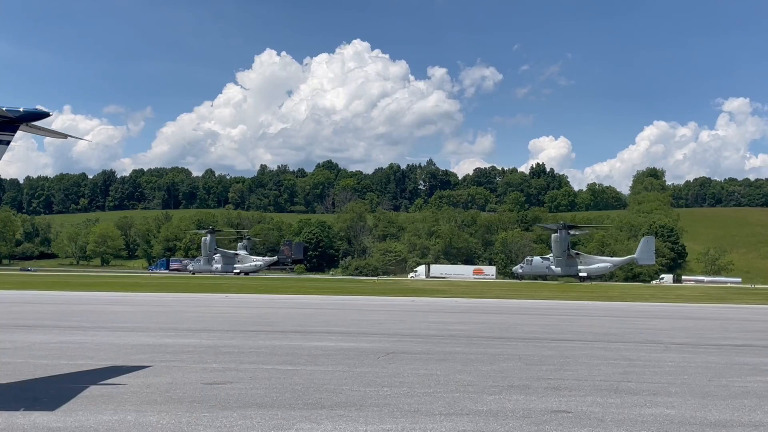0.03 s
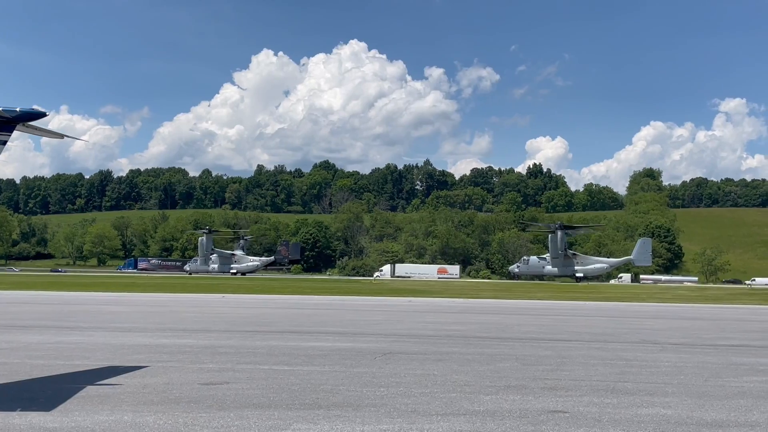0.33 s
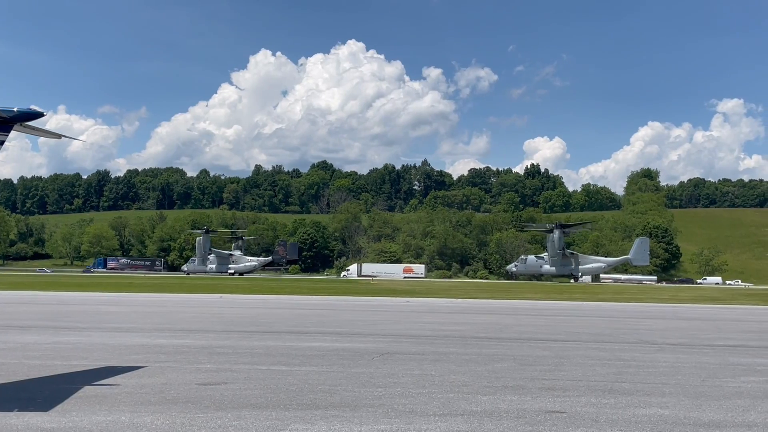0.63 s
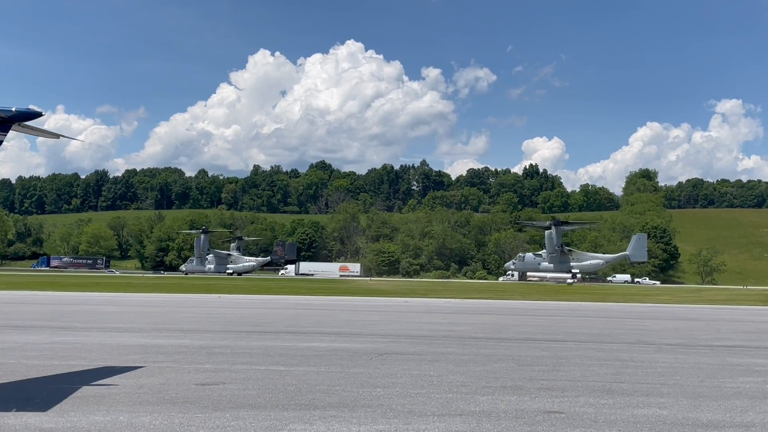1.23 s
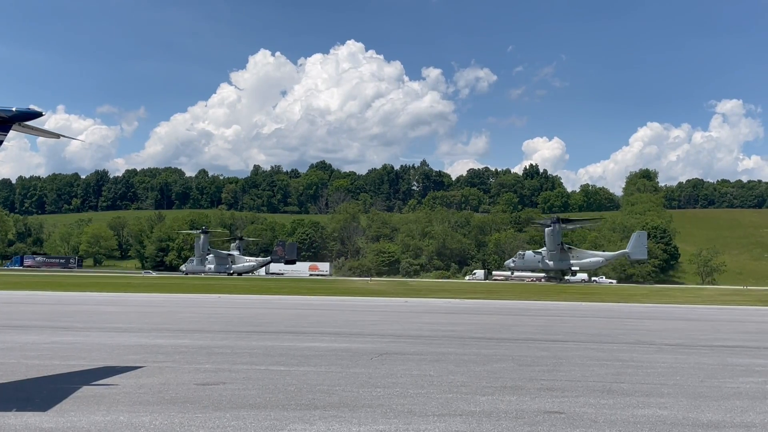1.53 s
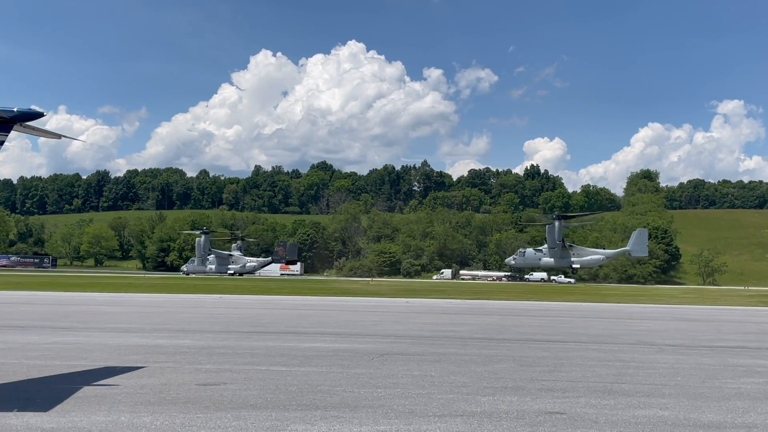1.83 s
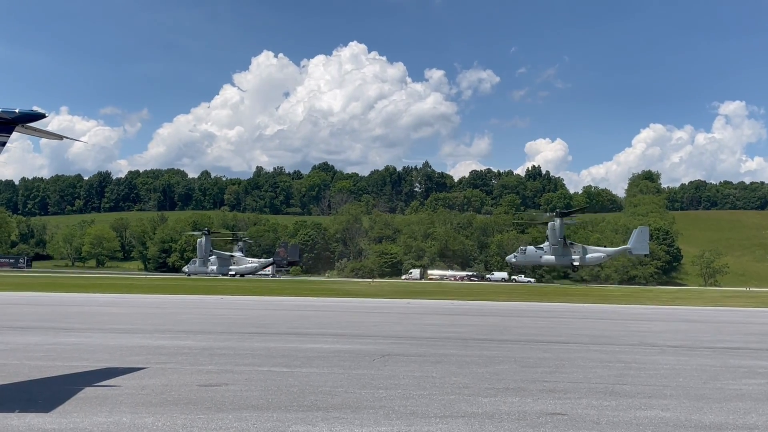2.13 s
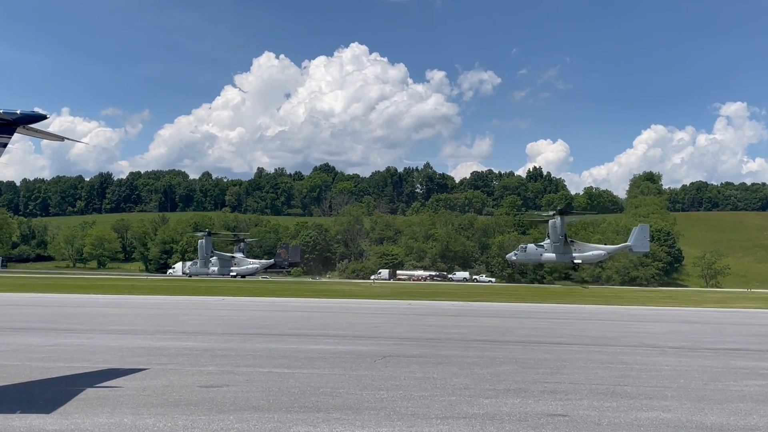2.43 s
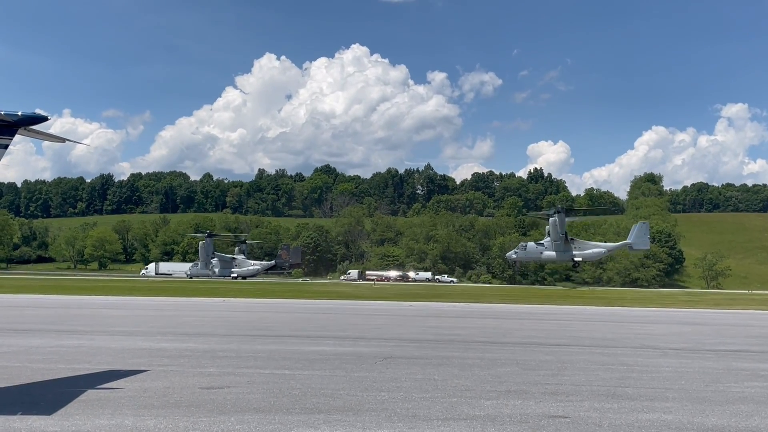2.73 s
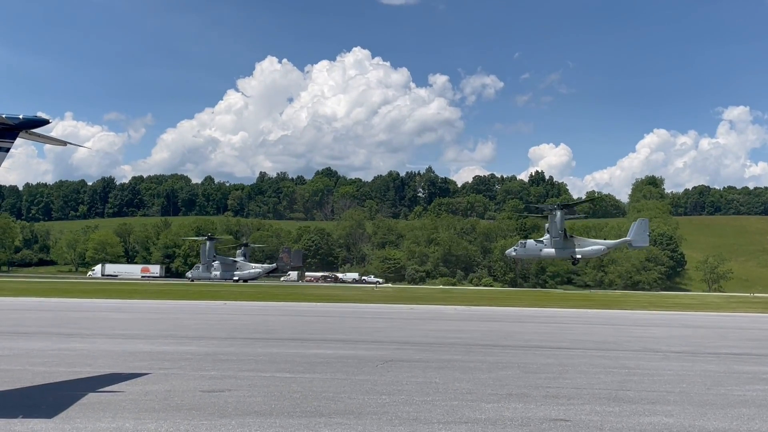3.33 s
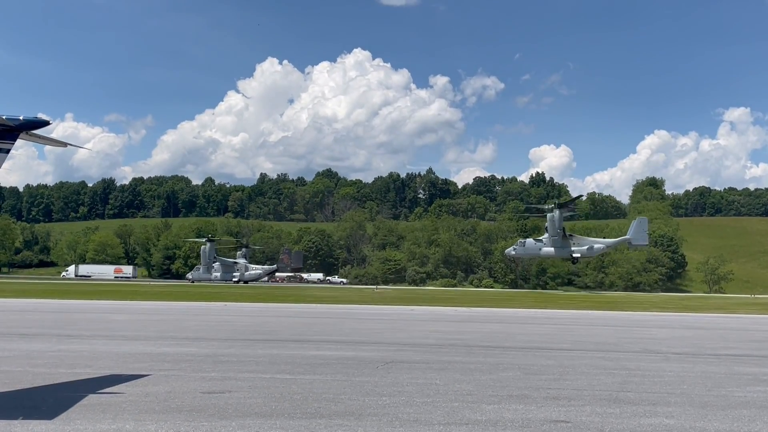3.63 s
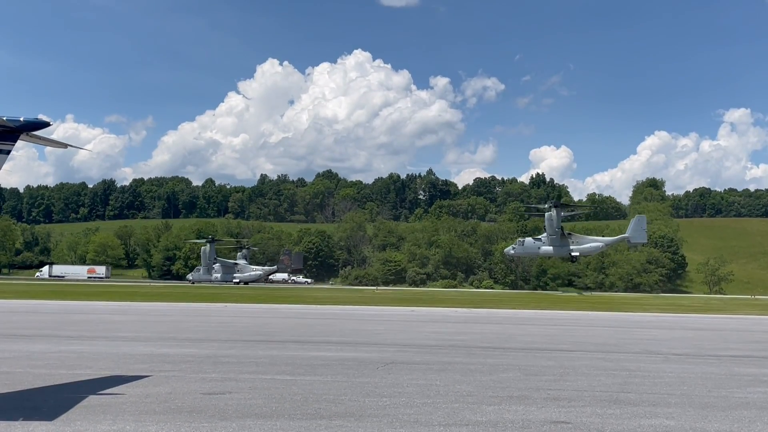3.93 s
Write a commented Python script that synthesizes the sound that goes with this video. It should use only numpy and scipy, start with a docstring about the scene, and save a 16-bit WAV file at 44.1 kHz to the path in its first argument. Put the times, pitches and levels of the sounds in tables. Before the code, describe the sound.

Tiltrotor aircraft rotors throb deeply from the start, with hard, rapid blade slaps over roaring downwash and turbine hiss. By about 0.5 seconds a second aircraft's blades join with a pulsing swish. After 1.6 seconds the slaps thin out as the first aircraft lifts. A brief growl swells near 2.3 seconds, and sharp cracks come around 2.6 and 3.6 seconds, while the throb and roar continue until 4 seconds.

```python
"""Two tiltrotor aircraft across an airfield: one lifts off, the other waits with rotors turning.
From the start, the lifting rotors throb in the bass over the roar of downwash and the hiss of turbines,
and their blades slap hard against tip vortices. Within half a second the waiting aircraft's blades join
in, swishing at a slightly slower rate. After 1.6 s, with the wheels clear, the slaps thin out. Near 2.3 s
a blade harmonic swells into a growl as the aircraft climbs; a few sharp cracks from either one follow."""
import sys
import numpy as np
from scipy import signal
from scipy.fft import rfft, irfft
from scipy.io import wavfile
from scipy.ndimage import uniform_filter1d, minimum_filter1d

SR = 44100
rng = np.random.default_rng(int(sys.argv[2]) if len(sys.argv) > 2 else 0)


def dump_mix(stems):
    """Bounce the given channels to the path in sys.argv[1] as a 16-bit WAV at rate SR."""
    frames = np.atleast_2d(stems).T  # one column per channel
    limited = np.clip(frames, -1, 1)  # hard clip at full scale
    pcm = np.round(limited * 32767).astype(np.int16)
    wavfile.write(sys.argv[1], SR, pcm)


N = 176400
T = np.arange(N) / SR
HZ = np.fft.rfftfreq(N, 1 / SR)
BLADE_HZ = 20.68  # blade-passage frequency of the lifting rotors


def amp(db):
    """Decibels to amplitude ratio."""
    return 10 ** (np.asarray(db) / 20)


def unit(x):
    """Normalisation to rms 1."""
    return x / np.sqrt(np.mean(x ** 2) + 1e-20)


def by_hz(points, hz=HZ):
    """Interpolation on a log-frequency axis."""
    f, value = np.transpose(points)
    return np.interp(np.log(hz + 1), np.log(f + 1), value)


def levels(table):
    """One amplitude envelope for each dB column of a time table."""
    s, *columns = np.transpose(table)
    return [amp(np.interp(T, s, db)) for db in columns]


def drift(rate_hz):
    """Random modulation: low-passed noise of rms 1."""
    spectrum = rfft(rng.standard_normal(N)) * (HZ > 0)
    return unit(irfft(spectrum / (1 + (HZ / rate_hz) ** 4), N))


def pair(a, b):
    """Partial coherence: two unrelated spectra mix as mid and side into left and right."""
    # Each row: frequency in Hz, coherence between the channels.
    coherence = [(100, .99), (330, .8), (600, .5), (950, .58), (1800, .97), (8000, .93)]
    same = np.clip(by_hz(coherence), 0, 1)
    mid, side = a * np.sqrt((1 + same) / 2), b * np.sqrt((1 - same) / 2)
    return irfft([mid + side, mid - side], N)


def noise(colour):
    """Spectral shaping of white noise, in stereo."""
    white = rfft(rng.standard_normal((2, N)))
    return unit(pair(*white * amp(by_hz(colour))))


def causal(colour):
    """Minimum-phase response: the phase follows from the log gain by Hilbert transform."""
    log_gain = np.log(amp(by_hz(colour, abs(np.fft.fftfreq(N, 1 / SR)))))
    return np.exp(np.conj(signal.hilbert(log_gain)))[:len(HZ)]


def scatter(t60):
    """Scattering from ground and trees: the spectrum of a sparse, decaying tail of echoes."""
    echoes = rng.standard_normal(N) * (rng.random(N) < .05)
    return rfft(unit(echoes * amp(-60 * T / t60))) / np.sqrt(N)


def multipath(drive, colour, echo_db=-16, echo_t60=.11, side_t60=.092):
    """Multipath propagation: coloured pulses arrive directly and as shifting echoes."""
    body = causal(colour)
    echoes = amp(echo_db) * rfft(drive * drift(1.8)) * scatter(echo_t60)
    side = rfft(drive * drift(16)) * scatter(side_t60)
    return unit(pair(body * (rfft(drive) + echoes), body * side))


def downwash_and_turbines(churn_hz=90, roar_churn_db=2, hiss_churn_db=1):
    """Turbulence noise: the downwash churns and roars under a steadier turbine hiss."""
    # Each row: time in seconds, roar level in dB, hiss level in dB.
    wash_levels = [(0, -16, -33), (.6, -20.5, -33.5), (.85, -19.5, -36), (1.3, -23.5, -39),
                   (1.7, -22.5, -36.5), (2.1, -23, -36.5), (4, -23, -35.5)]
    # Each row of both spectra: frequency in Hz, relative level in dB.
    roar_colour = [(20, -23), (50, -3), (130, 5), (400, 2), (800, -4.5), (1560, -14), (1820, -13),
                   (4000, -46.5)]
    hiss_colour = [(700, -18), (1800, 1.5), (2700, 4), (3800, -2), (5700, -4), (6900, -0.5), (9700, -21),
                   (11500, -27)]
    roar_gain, hiss_gain = levels(wash_levels)
    churn = drift(churn_hz)
    roar = roar_gain * unit(noise(roar_colour) * amp(roar_churn_db * churn))
    hiss = hiss_gain * noise(hiss_colour) * amp(hiss_churn_db * churn)
    return roar + hiss


def waiting_swish(blade_hz=20.49, first_s=.02, width_s=.0045, uneven_db=2.5):
    """Amplitude-modulated noise: each blade of the waiting aircraft passes with a crackly puff."""
    # Each row: time in seconds, level in dB.
    swish_levels = [(0, -66.5), (.5, -28), (2.2, -38), (2.6, -25.5), (2.9, -31.5), (3.25, -39.5),
                    (3.45, -28), (3.65, -29), (4, -27)]
    # Each row: frequency in Hz, relative level in dB.
    swish_colour = [(100, -30), (400, 9), (1200, 4.5), (1800, -5.5), (3000, -9), (4500, -14.5),
                    (7000, -23.5), (11000, -62)]
    from_blade_s = (((T - first_s) * blade_hz + .5) % 1 - .5) / blade_hz
    puffs = np.exp(-.5 * (from_blade_s / width_s) ** 2) * amp(uneven_db * drift(570))
    return levels(swish_levels)[0] * unit(puffs) * noise(swish_colour)


def throb(first_s=.024, trim_db=-2, waver_hz=.97, strong_rad=.34, weak_rad=.49, flutter_hz=2.56):
    """Rotational noise: the blades' suction pulses form a harmonic series that wavers in moving air."""
    # Each row: time in seconds, then levels of harmonics 3, 4 and 7 in dB before the trim.
    strong_harmonics = [(0.05, -10.5, -17.5, -57), (0.23, -14.5, -16, -23), (0.54, -28.5, -18.5, -18.5),
                        (1.33, -19.5, -21, -43), (1.63, -14, -28, -18), (1.71, -16.5, -18.5, -36),
                        (2.05, -22, -22, -25.5), (3.25, -15.5, -20.5, -26.5), (3.97, -29.5, -17.5, -28.5)]
    # Each row: harmonic number, mean level in dB.
    weak_harmonics = [(2, -41.5), (5, -42), (6, -35), (9, -33), (19, -36.5)]
    angle = 2 * np.pi * BLADE_HZ * (T - first_s)
    out = np.zeros(N)
    for k, gain in zip((3, 4, 7), levels(strong_harmonics)):
        out -= amp(trim_db) * gain * np.cos(k * angle + strong_rad * drift(waver_hz))
    for k, db in weak_harmonics:
        gain = amp(db + 3.5 * drift(flutter_hz))
        out -= gain * np.cos(k * angle + weak_rad * np.sqrt(k) * drift(waver_hz))
    return np.sqrt(2) * out


def growl(harmonic=17, peak_s=2.326, width_s=.1, peak_db=-24):
    """One high blade harmonic swells and fades under a Gaussian envelope as the aircraft climbs."""
    swell = np.exp(-.5 * ((T - peak_s) / width_s) ** 2)
    tone = np.cos(2 * np.pi * harmonic * BLADE_HZ * T + .5 * drift(10))
    return amp(peak_db) * swell * unit(tone)


def strikes(delay_s, jitter_s=.0003, uneven_db=1):
    """Quasi-periodic excitation: one impulse per blade passage, uneven in time and strength."""
    passes = np.arange(1, int(N / SR * BLADE_HZ) + 1) / BLADE_HZ
    jitter, size = rng.standard_normal((2, len(passes)))
    arrival_s = passes + np.interp(passes, T, delay_s + np.zeros(N)) + jitter_s * jitter
    out = np.zeros(N)
    out[np.clip((arrival_s * SR).astype(int), 0, N - 1)] = amp(uneven_db * size)
    return out


def hollow_ring(delay_s, bandwidth_hz=45):
    """Damped resonance: each thump dies away in a short ring of shifting pitch."""
    # Each row: time in seconds, level in dB, centre frequency in Hz.
    resonance = [(.15, -23, 227), (.47, -21, 149), (.58, -21.5, 387), (.72, -21.5, 310), (.82, -15, 178),
                 (.87, -18, 280), (1, -36, 304), (1.22, -16, 340), (1.65, -37.5, 338), (2.7, -36.5, 414)]
    s, db, centre_hz = np.transpose(resonance)
    carrier = np.exp(2j * np.pi * np.cumsum(np.interp(T, s, centre_hz)) / SR)
    pole = np.exp(-np.pi * bandwidth_hz / SR)
    ringing = carrier * signal.lfilter([1], [1, -pole], strikes(delay_s) / carrier)
    return amp(np.interp(T, s, db)) * unit(ringing.imag)


def slaps(delay_s, level_table, split_s=.001238, second_gain=.74, tear_db=-5, tear_s=.0024):
    """Blade-vortex interaction: a thump, and a double crack with a puff of torn air."""
    # Each row of both spectra: frequency in Hz, relative level in dB.
    thump_colour = [(60, -27.5), (130, -8.5), (230, -0.5), (360, -1.5), (750, -8.5), (6000, -88)]
    crack_colour = [(150, -53), (450, -1), (780, 9), (1350, 1.5), (1600, -8), (2600, -9), (4000, -26.5),
                    (11000, -67)]
    hits = strikes(delay_s)
    double = hits + second_gain * strikes(delay_s + split_s)  # two tip vortices struck in turn
    puff = signal.lfilter([1], [1, -np.exp(-1 / (tear_s * SR))], double) * rng.standard_normal(N)
    crack = unit(double) + amp(tear_db) * unit(puff)
    thump_gain, crack_gain = levels(level_table)
    return thump_gain * multipath(hits, thump_colour) + crack_gain * multipath(crack, crack_colour)


def twin_rotor(delay_s=.0128):
    """Blade-vortex interaction at the lifting aircraft's other rotor, later in each blade period."""
    # Each row: time in seconds, thump level in dB, crack level in dB.
    slap_levels = [(.6, -24, -44.5), (2.4, -31.5, -34), (2.55, -20.5, -28.5), (2.8, -36.5, -34)]
    return slaps(delay_s, slap_levels)


def near_rotor():
    """Varying travel time: the near rotor's slaps and ring come early or late as the aircraft shifts."""
    # Each row: time in seconds, delay in seconds.
    delays = [(.1, .0015), (.45, -.0012), (.95, -.0002), (1.12, .0015), (1.55, .0012), (2.2, .003),
              (3.5, .001)]
    # Each row: time in seconds, thump level in dB, crack level in dB.
    slap_levels = [(0, -10, -22), (.45, -28.5, -21.5), (.6, -18.5, -23.5), (0.852, -18, -22),
                   (.97, -20.5, -19.5), (1.2, -21, -25), (1.38, -21, -23.5), (1.58, -21.5, -27.5),
                   (1.8, -28, -35.5), (3.2, -36, -55), (4, -28, -40)]
    delay_s = np.interp(T, *np.transpose(delays))
    return slaps(delay_s, slap_levels) + hollow_ring(delay_s)


def hard_slaps(fade_cycles=.46):
    """Impulsive noise: single sharp blade cracks from either aircraft, each one short pressure wave."""
    # Each row: start in seconds, envelope peak in dB, frequency in Hz.
    impacts = [(.144, -4.5, 800), (.337, -15, 1210), (0.5795, -10, 480), (.6763, -2, 392),
               (0.7242, -10, 310), (0.773, -10, 260), (.871, -8.5, 2900), (.967, -5.5, 3030),
               (1.015, -15.5, 3020), (1.065, -5, 900), (1.113, -11, 2450), (1.304, -9, 1100),
               (1.355, -8, 1100), (1.4035, -6, 650), (1.45, -6, 1000), (1.498, -9.5, 600),
               (1.548, -10.5, 1700), (1.597, -17.5, 2300), (2.557, -8.5, 1000), (2.575, -5, 1000),
               (3.631, -14, 1980), (3.678, -15.5, 1710)]
    out = np.zeros(N)
    for s, db, hz in impacts:
        cycles = np.maximum(T - s, 0) * hz
        age = cycles / fade_cycles
        out += amp(db) * age * np.exp(1 - age) * np.sin(2 * np.pi * cycles)
    return out


def scene():
    """Superposition of the two aircraft."""
    rotors = throb() + growl() + near_rotor() + hard_slaps() + twin_rotor() + waiting_swish()
    return rotors + downwash_and_turbines()


def record(dry, ceiling=.92, limiter_s=.002, start_s=.036, cutoff_hz=14300):
    """Left-right level and phase differences widen the sound; peak limiting and a low-pass follow."""
    # Each row: frequency in Hz, level of left over right in dB.
    balance = [(60, -.6), (170, -2), (330, -.8), (650, -3), (2000, 0)]
    # Each row: frequency in Hz, phase lead of the left in radians; opposed in phase near 9 kHz.
    lead = [(330, -.15), (520, -1.3), (1200, -.1), (3000, .6), (5300, .55), (5750, -1.6), (6700, -.7),
            (7500, -2.3), (9000, -3.2), (12000, -6.28)]
    half = np.array([[.5], [-.5]])
    heard = irfft(rfft(dry) * amp(half * by_hz(balance)) * np.exp(1j * half * by_hz(lead)), N)
    size = round(limiter_s * SR)
    gain = minimum_filter1d(ceiling / np.maximum(abs(heard).max(0), ceiling), 2 * size)
    smooth_gain = uniform_filter1d(uniform_filter1d(gain, size), size)
    fade_in = np.clip((T - start_s) / .001, 0, 1)
    lowpass = signal.firwin(511, cutoff_hz, window=("kaiser", 9), fs=SR)
    return signal.oaconvolve(heard * smooth_gain * fade_in, lowpass[None], "same")


dry = scene()
out = record(dry)
dump_mix(out)
```